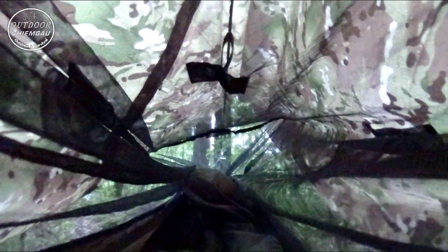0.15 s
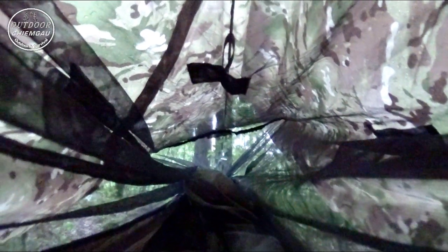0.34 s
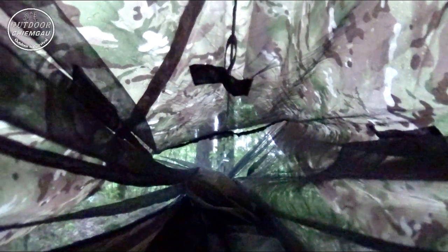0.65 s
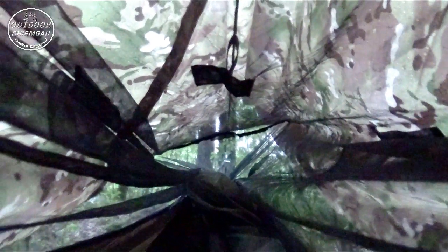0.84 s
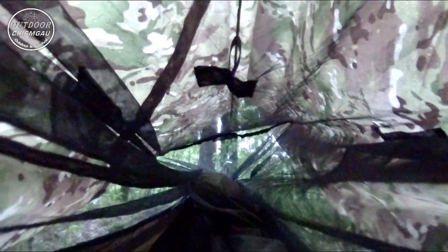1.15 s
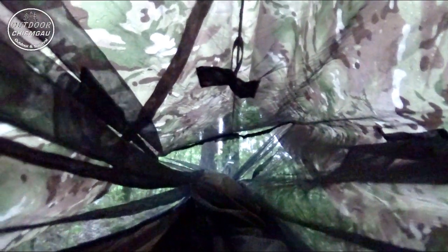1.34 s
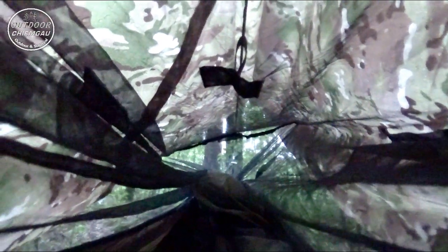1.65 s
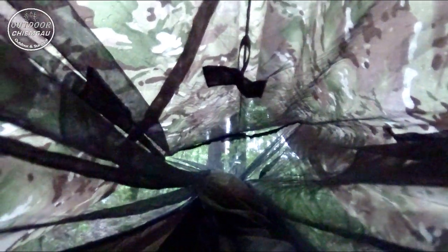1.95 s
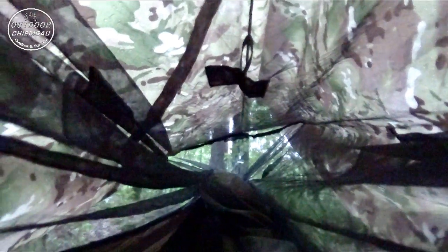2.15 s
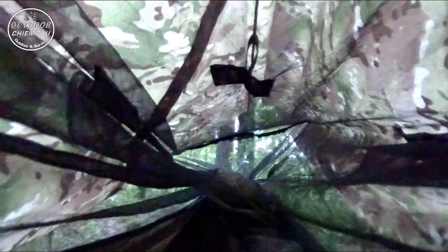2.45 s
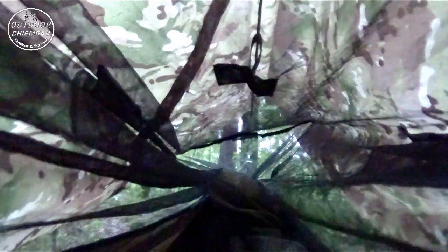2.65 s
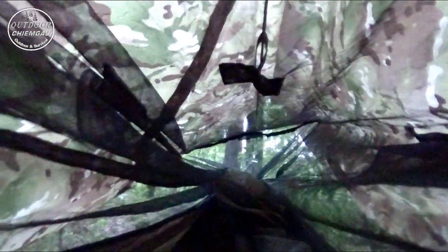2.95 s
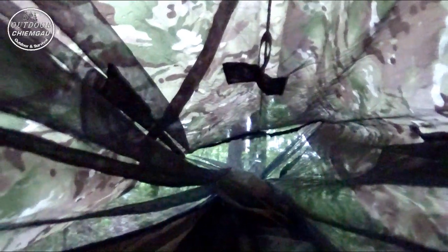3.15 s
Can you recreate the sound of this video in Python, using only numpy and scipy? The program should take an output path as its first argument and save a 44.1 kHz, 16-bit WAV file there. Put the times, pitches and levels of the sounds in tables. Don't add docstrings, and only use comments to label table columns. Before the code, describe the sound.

Rain patters on stretched cloth heard from underneath, with occasional heavy drips snapping and splashing loudly

```python
import sys
import numpy as np
from scipy import signal
from scipy.fft import rfft, irfft, next_fast_len
from scipy.io import wavfile
from scipy.ndimage import uniform_filter1d

SR = 44100
rng = np.random.default_rng(int(sys.argv[2]) if len(sys.argv) > 2 else 0)


def unload_audio(sound):
    columns = np.transpose(np.atleast_2d(sound))
    steps = np.round(np.clip(columns, -1, 1) * 32767)
    wavfile.write(sys.argv[1], SR, steps.astype(np.int16))


def gain_from_db(level_db):
    decades = np.asarray(level_db, float) / 20
    return 10 ** decades


N = 145530

LEVEL_S = 0.005
LEFT_DB = -1
SMALL_CYCLES, SMALL_ROUGH = 19, 0.79
HISS_TOP_HZ, PEAK_TOP_HZ = 15800, 16900


def unit(x):
    return x / np.sqrt(np.mean(x ** 2, axis=-1, keepdims=True) + 1e-20)


def along(points, hz):
    f, v = np.transpose(points)
    return np.interp(np.log(hz + 1), np.log(f + 1), v)


def filtered(x, response):
    n = x.shape[-1]
    m = next_fast_len(n + 4096)
    spectrum = rfft(x, m) * response(np.fft.rfftfreq(m, 1 / SR))
    return irfft(spectrum, m)[..., :n]


def pair(shape, alike):
    a, b = rng.standard_normal((shape[0], 2, shape[1])).transpose(1, 0, 2)
    turn = np.arccos(np.clip(alike, 0, 1)) / 2
    common, differing = np.cos(turn) * a, np.sin(turn) * b
    return np.array([common + differing, common - differing])


def place(s, db, shapes, pan_db):
    at = np.round(np.asarray(s) * SR).astype(int)[:, None] + np.arange(shapes.shape[2])
    energy = np.sum(shapes.mean(axis=0) ** 2, axis=1) / (LEVEL_S * SR)
    side_db = np.outer([0.5, -0.5], pan_db * np.ones(len(s)))
    gain = gain_from_db(db + side_db) / np.sqrt(energy)
    sides = gain[:, :, None] * shapes
    return np.array([np.bincount(at.ravel(), side.ravel(), N + SR)[:N] for side in sides])


def taps(s, db, hz, pan_db, cycles, rough, size=900):
    t, hz = np.arange(size) / SR, np.asarray(hz)[:, None]
    rise = 1 - np.exp(-t * hz * 8)
    fall = gain_from_db(-60 * t * hz / cycles)

    def band(f):
        return (1j * f * hz * 1.2 / (hz * hz - f * f + 1j * f * hz * 2.04)) ** 2

    rattle = unit(filtered(pair((len(s), size), 0.64), band))
    swing = np.sqrt(2) * np.sin(2 * np.pi * hz * t)
    share = np.clip(rough, 0, 1)
    mix = np.sqrt(1 - share) * swing + np.sqrt(share) * rattle
    return place(s, db, rise * fall * mix, pan_db)


def splashes(s, db, hz, size=1300):
    # f/Hz, level/dB
    burst_colour = [(2500, -18.5), (4000, -4), (5800, -5.5), (10500, 0), (13000, -6), (16500, -39)]
    t, hz = np.arange(size) / SR, np.asarray(hz)[:, None]

    def colour(f):
        peak = 1 + 1.6 * np.exp(-((f - hz) / 900) ** 2)
        return gain_from_db(along(burst_colour, f)) * peak

    noise = filtered(pair((len(s), size), 0.88), colour)
    crack = gain_from_db(-60 * t / 0.0031)
    spray = gain_from_db(-4.5 - 60 * t / 0.021)
    rise = 1 - np.exp(-t / 0.00028)
    return place(s, db, noise * (crack + spray) * rise, 0)


def hiss():
    # f/Hz, density/dB per Hz
    leaf_colour = [(25, -25), (135, -14), (850, 0), (2500, -6), (5720, -9.5), (9500, -6.5), (12500, -20),
                   (15700, -23.5)]
    # f/Hz, left-right likeness
    leaf_alike = [(100, 0.96), (1500, 0.62), (6000, 0.7), (12000, 0.86)]
    z = signal.stft(rng.standard_normal((2, N)), nperseg=256)[2]
    patches = uniform_filter1d(rng.standard_normal(z.shape[1:]), size=12, axis=0)
    patches = uniform_filter1d(patches, size=5, axis=1)
    sway = uniform_filter1d(rng.standard_normal(z.shape[2]), size=8)
    wobble_db = 2.26 * patches / patches.std() + 1.3 * unit(sway)
    two = signal.istft(z * gain_from_db(wobble_db), nperseg=256)[1][:, :N]

    def mid_side_colour(hz):
        turn = np.arccos(np.clip(along(leaf_alike, hz), -1, 1)) / 2
        return gain_from_db(along(leaf_colour, hz)) * (hz < HISS_TOP_HZ) * [np.cos(turn), np.sin(turn)]

    mid, side = filtered(two, mid_side_colour)
    return gain_from_db(-55.5) * unit(np.array([mid + side, mid - side]))


def patter():
    per_s, base_db, spread_db = 340, -67, 5
    mid_hz, octaves = 2700, 1.3
    draw = rng.random((1200, 5))[:int(per_s * N / SR)]
    s = draw[:, 0] * N / SR
    db = base_db - spread_db * np.log(np.clip(draw[:, 1], 0.15, 1))
    hz = np.clip(mid_hz * 2 ** (octaves * (2 * draw[:, 2] - 1)), 300, 11000)
    pan_db = LEFT_DB + 5 * (draw[:, 3] - 0.5)
    body = taps(s, db, hz, pan_db, SMALL_CYCLES, SMALL_ROUGH, size=500)
    return body + splashes(s, db - 6.5, 5000 + 6000 * draw[:, 4], size=400)


def small_drops():
    # t/s, tap level/dB, f/Hz, splash level/dB
    light_table = [(0.0231, -51.5, 2700, -49), (0.0677, -51.5, 1980, -51.5), (0.105, -47, 4500, -74),
                   (0.1345, -45.5, 990, -53.5), (0.1583, -46.5, 3020, -68), (0.216, -54, 940, -52),
                   (0.2314, -47, 1690, -45.5), (0.236, -43.5, 2000, -59), (0.3666, -49, 910, -50),
                   (0.4327, -47.5, 2180, -65), (0.4405, -55, 2650, -52), (0.543, -46.5, 1060, -51),
                   (0.6888, -51, 3130, -68), (0.8058, -47, 2220, -61), (0.8743, -50, 1300, -71),
                   (0.8906, -55, 2180, -66), (1.156, -45, 1030, -72), (1.2342, -49.5, 1990, -54),
                   (1.2749, -52, 1020, -65), (1.2855, -52.5, 2740, -62), (1.314, -49.5, 1470, -51),
                   (1.3519, -45, 3200, -53), (1.4064, -55, 2870, -68), (1.4168, -49.5, 980, -53.5),
                   (1.4743, -47, 2270, -54),
                   (1.5241, -47, 1280, -47), (1.5329, -40, 2400, -45.5), (1.606, -48, 674, -64),
            (1.6792, -46.5, 2630, -51), (1.8402, -48, 1910, -62), (2.095, -49.5, 820, -53),
            (2.1254, -45, 1350, -51.5), (2.194, -44.5, 1500, -49), (2.282, -47, 2270, -70),
            (2.317, -42, 990, -45.5), (2.46, -50, 1880, -53), (2.5435, -48.5, 1620, -53),
            (2.56, -45.5, 1450, -53), (2.6856, -45.5, 810, -72), (2.7693, -50, 1180, -49),
            (2.8045, -46.5, 2060, -54), (2.8837, -50, 820, -54), (2.935, -51, 4600, -50),
            (2.9839, -50, 1230, -56), (3.019, -51.5, 850, -50.5), (3.1379, -63, 550, -51),
            (3.165, -46, 2170, -54.5), (3.1753, -47.5, 1010, -54), (3.234, -71, 1400, -53.5),
                   (0.034, -72, 988, -54), (0.116, -56, 930, -60), (0.186, -60, 2190, -53),
             (0.204, -56, 1430, -63), (0.338, -57, 4800, -66), (0.967, -46.5, 1890, -49),
             (1.036, -49, 2000, -60), (1.06, -50, 3000, -63), (1.126, -48, 2510, -65),
             (1.211, -46, 3200, -62), (1.356, -48, 940, -52.5), (1.564, -48, 4150, -52),
             (1.807, -58, 710, -50), (1.88, -56, 1460, -49), (2.1728, -41.5, 1000, -49),
             (2.271, -49, 1870, -65), (2.341, -55, 1100, -58), (2.432, -54, 4910, -53),
             (2.435, -48.5, 970, -64), (2.465, -52, 3200, -60), (2.48, -65, 4000, -49),
             (2.499, -58, 5500, -57), (2.79, -55, 4200, -65), (2.977, -53, 1340, -54),
             (3.2, -64, 3380, -66), (3.227, -62, 800, -68)]
    s, db, hz, splash_db = np.transpose(light_table)
    body = taps(s, db, hz, LEFT_DB, SMALL_CYCLES, SMALL_ROUGH)
    return body + splashes(s, splash_db, rng.uniform(7900, 9660, len(s)))


def big_drops():
    # t/s, level/dB, f/Hz, left-right balance/dB
    ring_table = [(0.2681, -45, 1040, -1), (0.4043, -43, 1410, -4), (0.619, -38, 1770, -0.5),
                  (0.9523, -46, 580, -4), (0.984, -38.5, 1020, -3), (1.018, -36.5, 1080, -1),
                  (1.048, -47, 860, 0), (1.0744, -42.5, 835, -4), (1.1161, -46, 1570, -3.5),
                  (1.1939, -49.5, 910, 0), (1.2225, -48, 1700, 5), (1.5293, -42.5, 1440, -14),
                  (1.5467, -26.5, 1270, 0), (1.5745, -45, 875, 0), (1.737, -56, 1020, -3),
                  (1.797, -45.5, 1510, 0), (1.8562, -42.5, 1430, -4.5), (1.903, -48, 1080, -1),
                  (1.984, -40.5, 1320, -1), (2.1801, -39.5, 1360, -1), (2.2303, -40.5, 1180, 3.5),
                  (2.3868, -76, 1280, -1), (2.42, -54.5, 1810, 1), (2.4875, -31, 1060, -4),
                  (2.9034, -28, 820, -1), (3.1006, -36, 1220, 3)]
    # snap level/dB, snap f/Hz, splash level/dB, splash centre f/Hz
    snap_table = [(-42, 2810, -56, 7600), (-45, 2280, -52, 9500), (-46, 2190, -37, 7000),
                  (-43, 3030, -48, 7500), (-36, 2900, -34.5, 8500), (-39.5, 1820, -31.5, 7560),
                  (-48, 3250, -65, 5970), (-46.5, 2840, -48, 6490), (-41.5, 2160, -40, 8400),
                  (-44, 2700, -44.5, 8000), (-45.5, 4900, -48, 7200), (-48.5, 1000, -59, 5900),
                  (-36.5, 2800, -38.5, 10400), (-44.5, 1440, -36.5, 9700), (-44.5, 3100, -44.5, 8900),
                  (-41.5, 4720, -42, 8900), (-42.5, 3010, -50, 8100), (-52, 3400, -40, 11600),
                  (-39.5, 3090, -34, 10100), (-41, 3040, -32, 7400), (-51, 4000, -51, 8020),
                  (-47.5, 3000, -39, 8800), (-57, 2150, -42.5, 7600), (-32, 2420, -41, 7900),
                  (-31, 2480, -34, 9200), (-44, 2800, -51, 7500)]
    # t/s, peak level/dB, f/Hz
    weave_table = [(0.268, -40, 4540), (0.404, -34.5, 3520), (0.6185, -32.5, 6570), (0.9517, -36, 4500),
                   (0.9846, -22.5, 3500), (1.0182, -22, 5890), (1.0182, -26.5, 3420), (1.0743, -38.5, 4740),
                   (1.116, -29.5, 3330), (1.1944, -36.5, 4000), (1.5466, -22, 3470), (1.5748, -28, 4150),
                   (1.9021, -36, 3450), (1.984, -24.5, 4740), (1.984, -30, 6000), (2.1792, -26, 5500),
                   (2.1808, -25, 4390), (2.3867, -37, 3330), (2.4198, -40.5, 5100), (2.4876, -25, 1923),
                   (2.4882, -27, 2690), (2.4878, -26.5, 4350), (2.9036, -20, 4320), (2.9036, -24.5, 4820),
                   (3.1008, -30.5, 4350)]
    # t/s, level/dB, f/Hz
    thump_table = [
        (0.2404, -40, 360),
        (0.9521, -42, 280),
        (0.9852, -38, 260),
        (1.5462, -49, 440),
        (1.5742, -46, 288),
        (1.8548, -37.5, 268),
        (1.984, -56, 307),
        (2.486, -57, 440),
        (2.689, -43.5, 470),
        (2.9022, -50, 460),
    ]
    s, ring_db, ring_hz, pan_db = np.transpose(ring_table)
    snap_db, snap_hz, splash_db, splash_hz = np.transpose(snap_table)
    weave_s, weave_db, weave_hz = np.transpose(weave_table)
    thump_s, thump_db, thump_hz = np.transpose(thump_table)
    ring = taps(s, ring_db, ring_hz, pan_db, cycles=8.4, rough=0.23)
    snap = taps(s, snap_db, snap_hz, pan_db, cycles=25.7, rough=0.32)
    weave = taps(weave_s, weave_db - 12.5, weave_hz, LEFT_DB, cycles=44.5, rough=0.24)
    splash = splashes(s, splash_db, splash_hz)
    thump = taps(thump_s, thump_db, thump_hz, 0, cycles=5.3, rough=0.05, size=2000)
    return ring + snap + weave + splash + thump


def tent(x):
    t = np.arange(SR // 10) / SR
    tail = rng.standard_normal((2, len(t))) * gain_from_db(-60 * t / 0.011) * (t > 0.002)
    return signal.fftconvolve(x, tail / np.linalg.norm(tail[0]), axes=1)[:, :N]


def scene():
    def cut(top_hz):
        def response(f):
            low_cut = (1j * f / (250 + 1j * f)) ** 2
            return low_cut * np.clip((top_hz - f) / 500, 0, 1) ** 2
        return response

    hard = filtered(big_drops(), cut(PEAK_TOP_HZ))
    soft = filtered(small_drops() + patter(), cut(HISS_TOP_HZ))
    drops = hard + soft
    return drops + gain_from_db(-17) * tent(drops) + hiss()


def band_limit(x):
    return signal.sosfilt(signal.butter(12, 16810, fs=SR, output="sos"), x)


def record(dry):
    # t/s, length/s, lower edge f/Hz
    dropouts = [(0.601, .004, 12500), (0.938, .009, 13800), (0.972, .007, 9500), (0.995, .017, 11000),
                (1.028, .012, 6500), (1.099, .012, 13000), (1.205, .008, 13500), (1.912, .014, 14000),
                (1.973, .006, 12000), (1.993, .008, 13500), (2.192, .008, 5500), (2.375, .007, 12500),
                (2.4, .015, 14000), (2.47, .012, 14500), (2.9145, .006, 2500)]
    mid = dry.mean(axis=0)
    side = filtered((dry[0] - dry[1]) / 2, lambda f: 1 / (1 + (f / 12100) ** 6))
    x = np.array([mid + side, mid - side])
    for s, length, hz in dropouts:
        near = slice(round(s * SR) - 500, round((s + length) * SR) + 500)
        t = np.arange(N)[near] / SR
        gap = np.clip(np.minimum(t - s, s + length - t) / 0.002 + 0.5, 0, 1)
        treble = filtered(x[:, near], lambda f: 1 / (1 + (hz / (f + 1)) ** 24))
        x[:, near] -= 0.985 * gap * treble
    return band_limit(x)


dry = scene()
out = record(dry)
unload_audio(out)
```